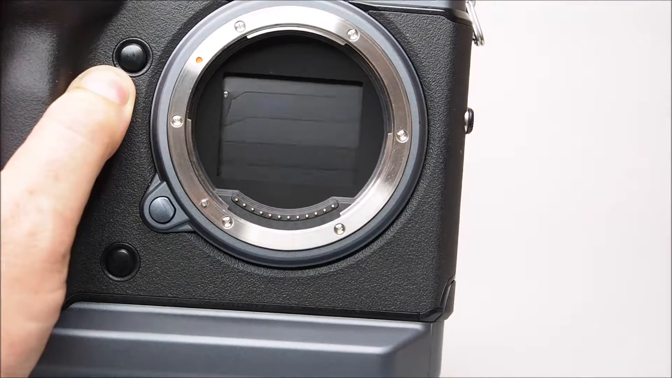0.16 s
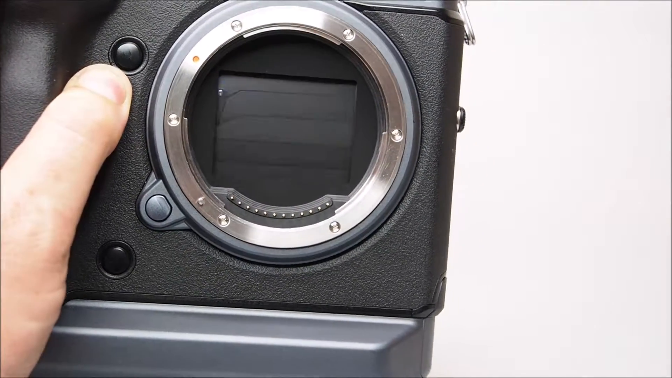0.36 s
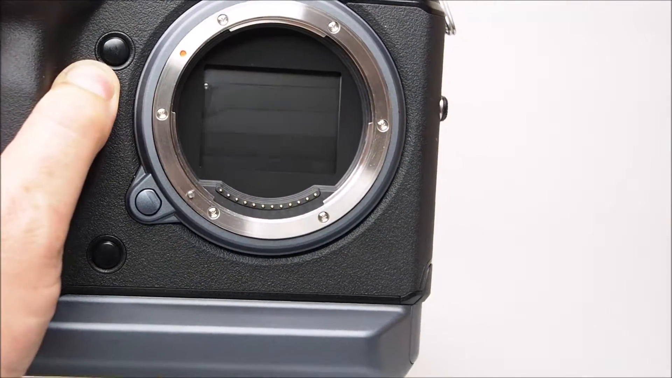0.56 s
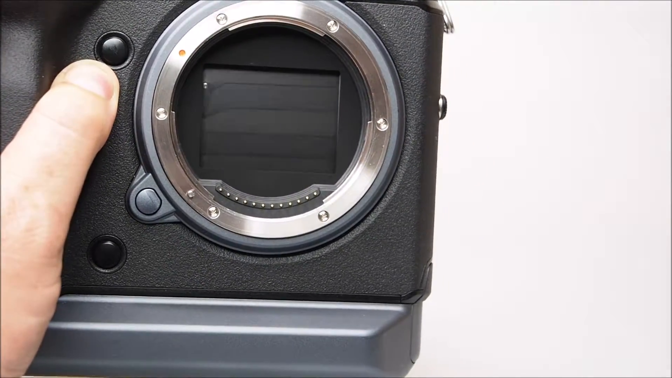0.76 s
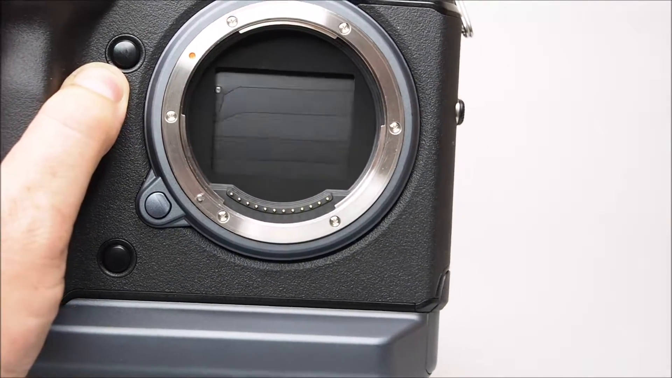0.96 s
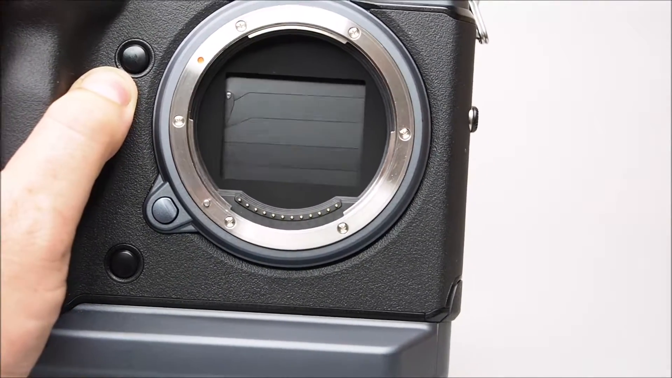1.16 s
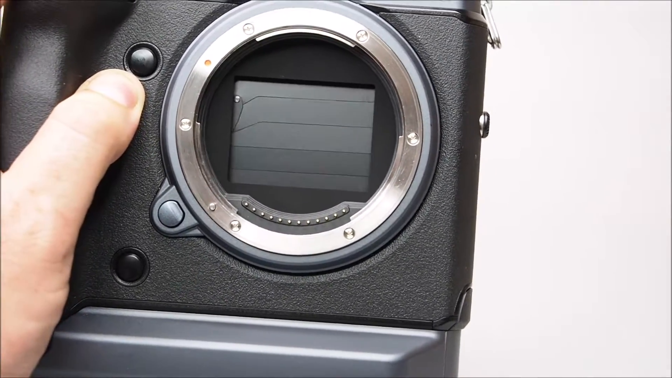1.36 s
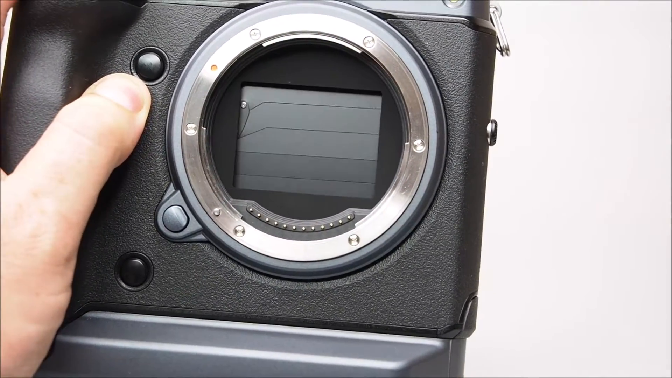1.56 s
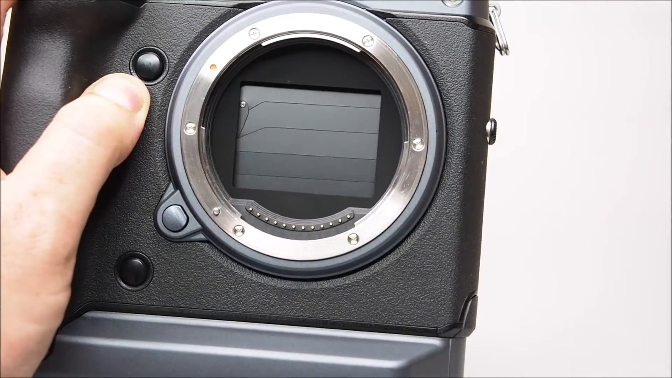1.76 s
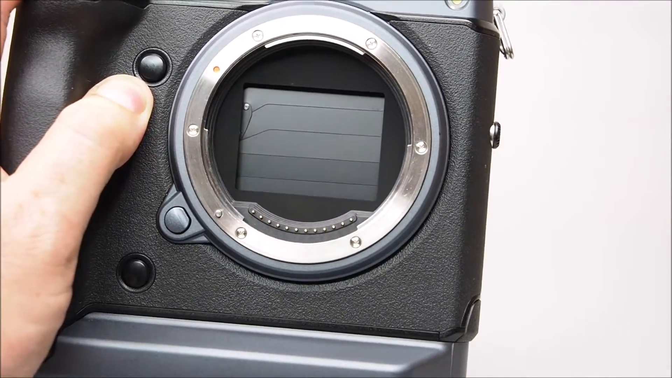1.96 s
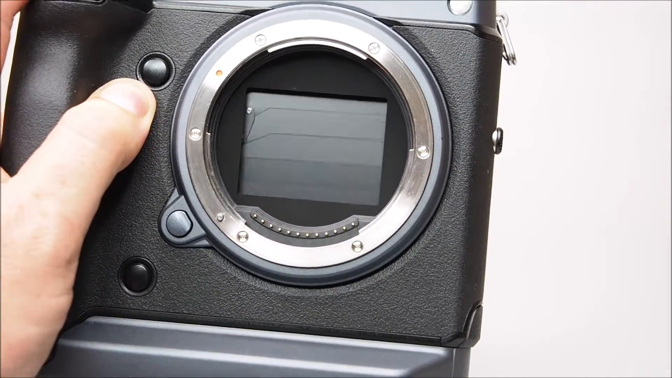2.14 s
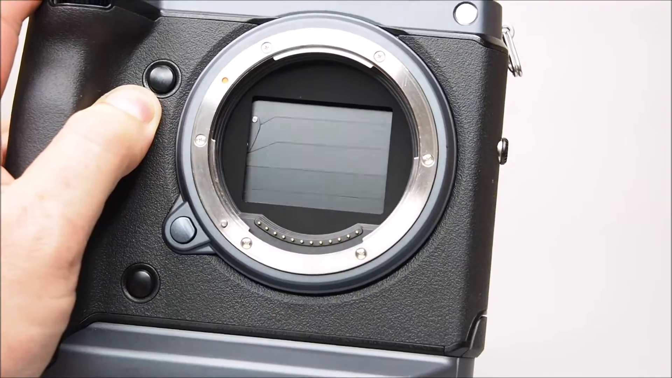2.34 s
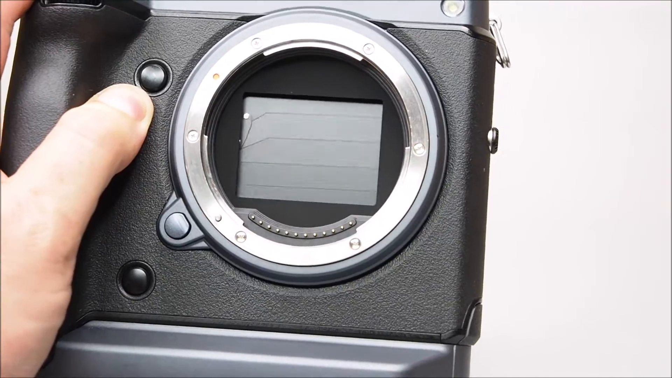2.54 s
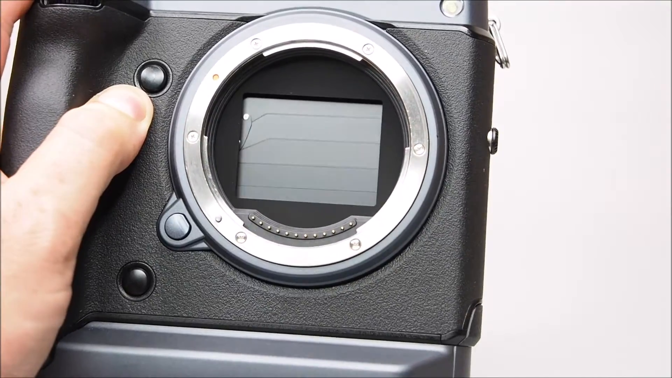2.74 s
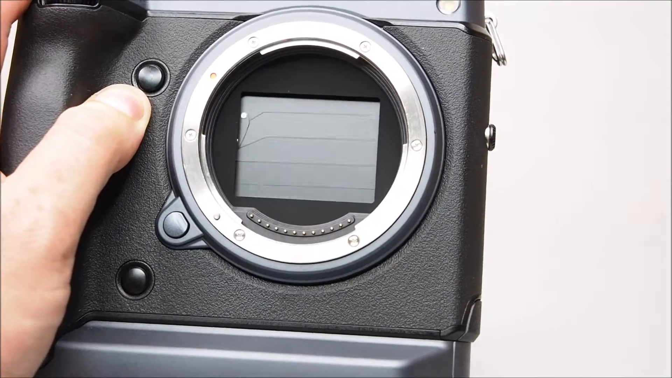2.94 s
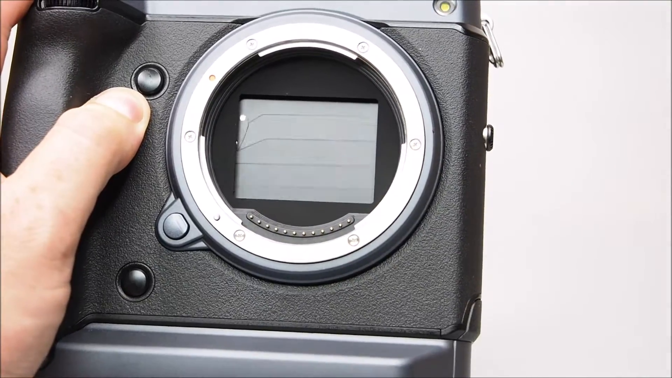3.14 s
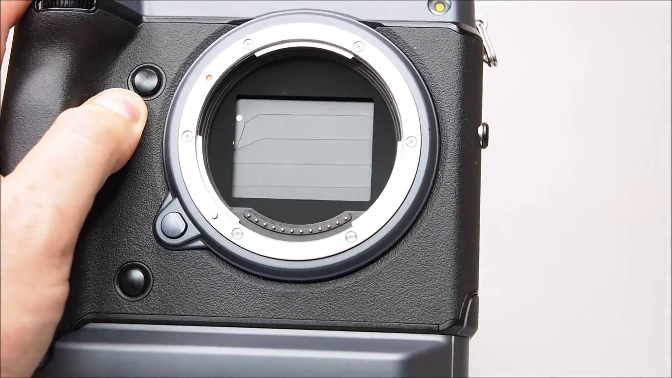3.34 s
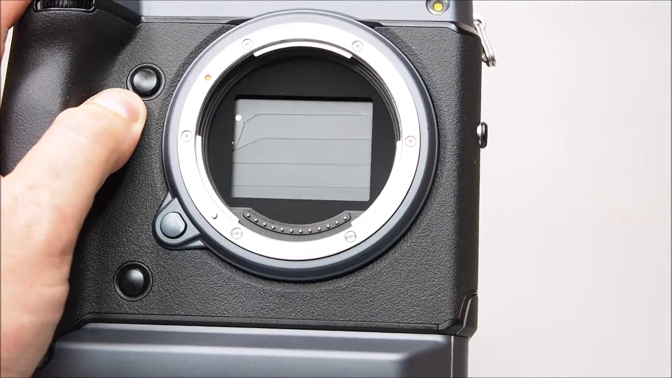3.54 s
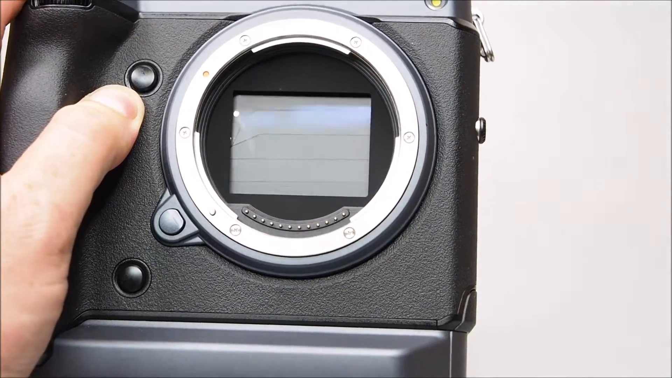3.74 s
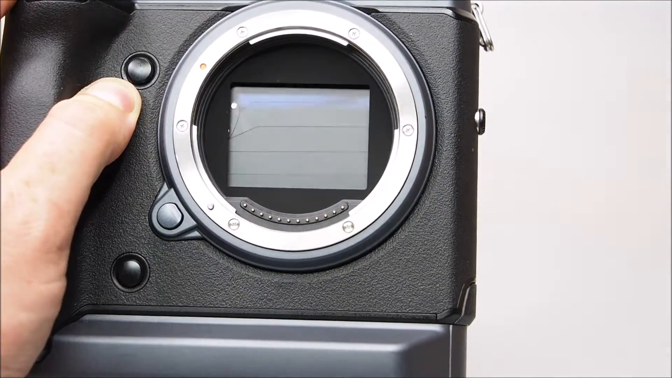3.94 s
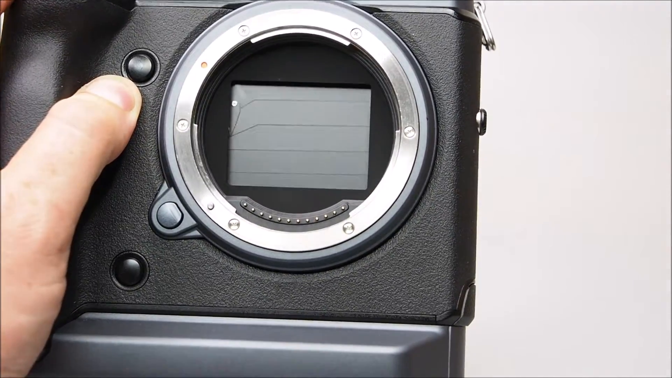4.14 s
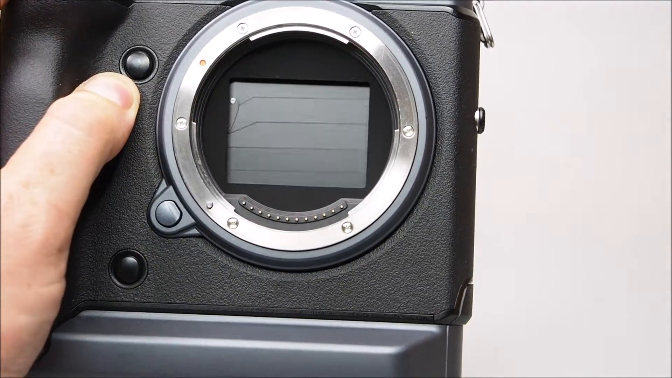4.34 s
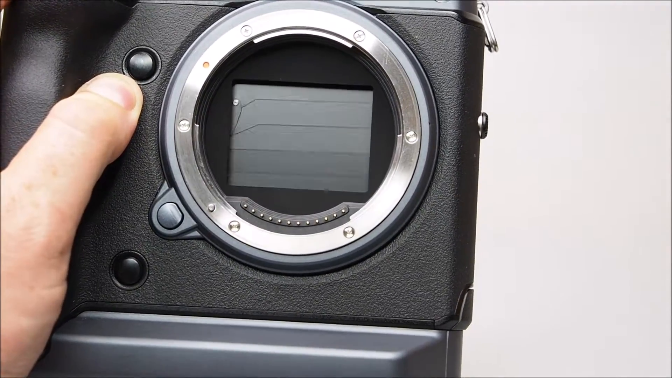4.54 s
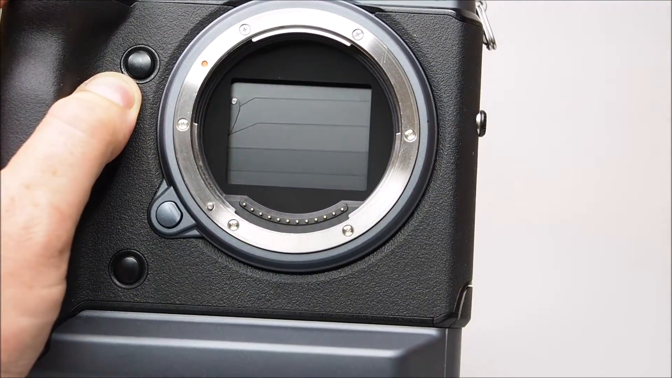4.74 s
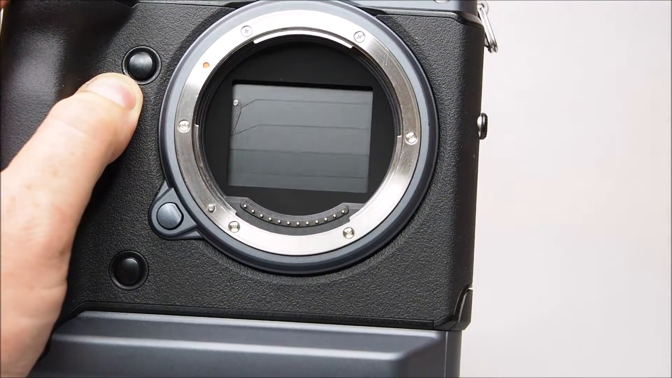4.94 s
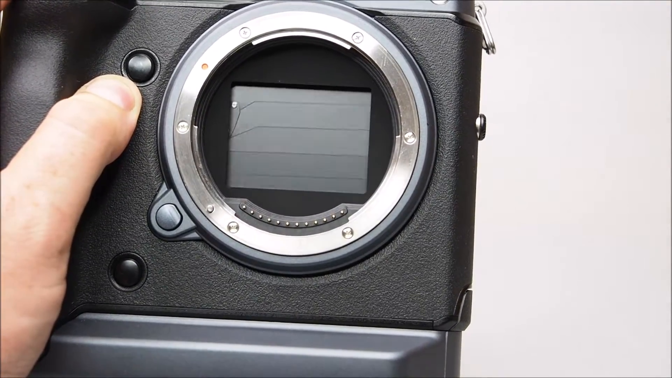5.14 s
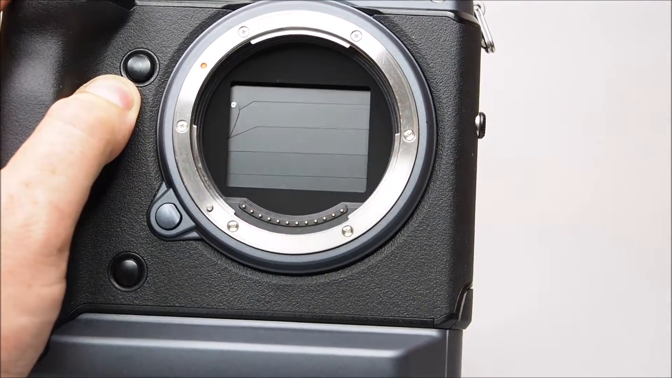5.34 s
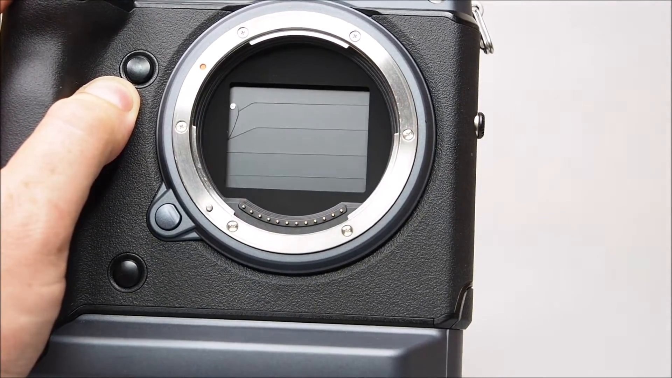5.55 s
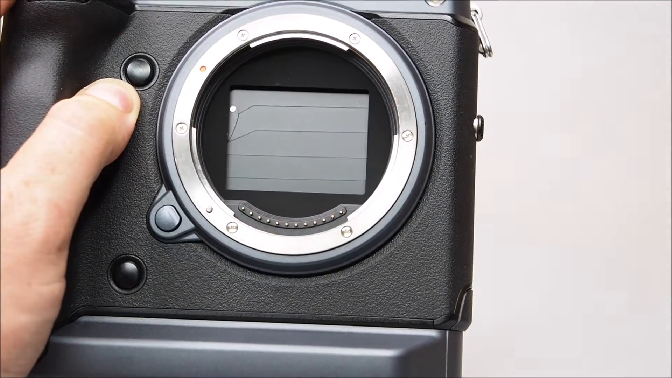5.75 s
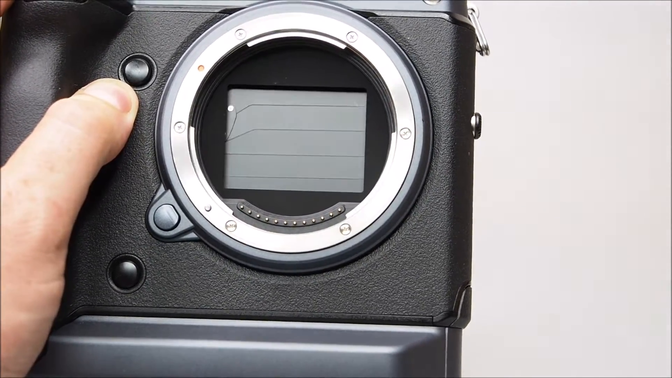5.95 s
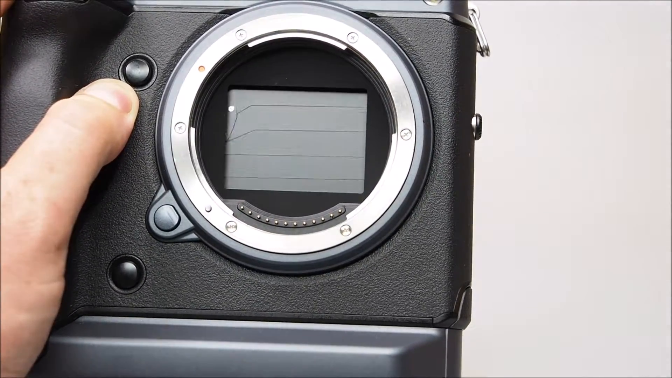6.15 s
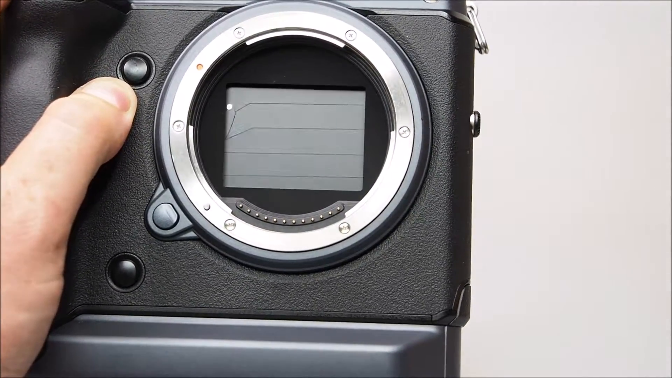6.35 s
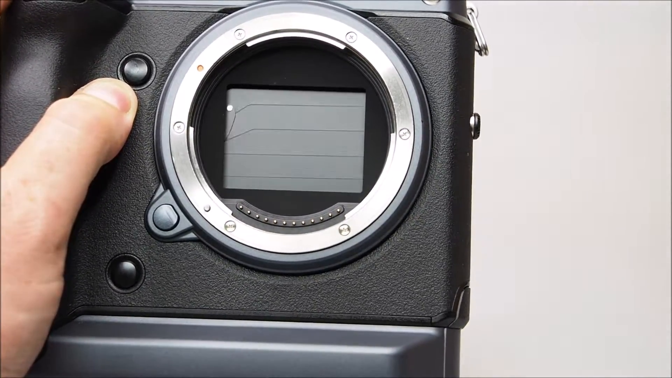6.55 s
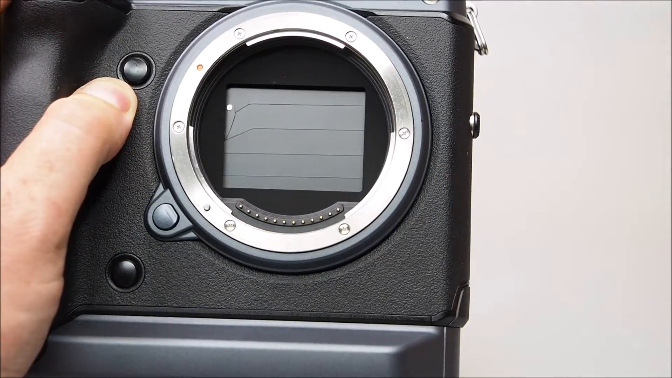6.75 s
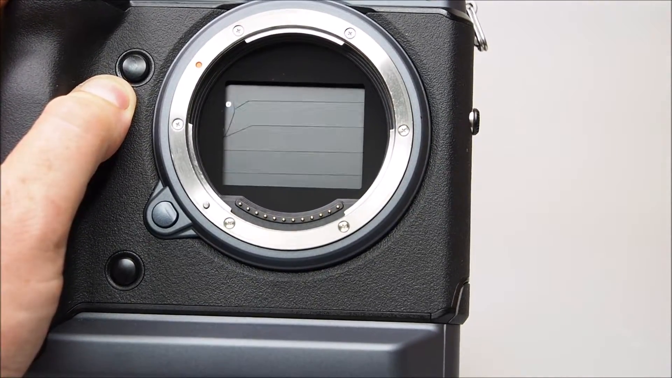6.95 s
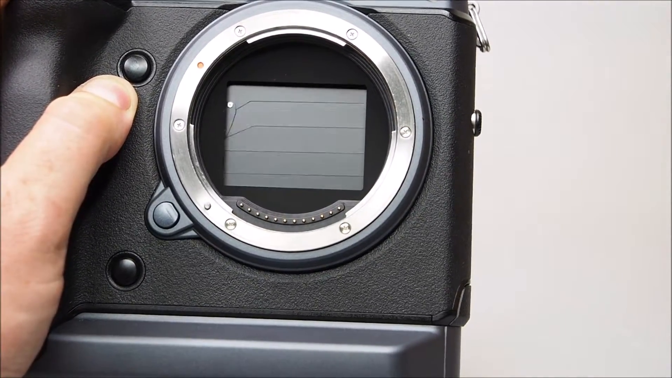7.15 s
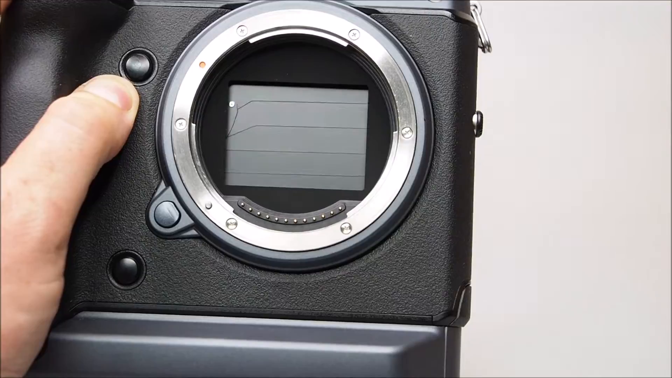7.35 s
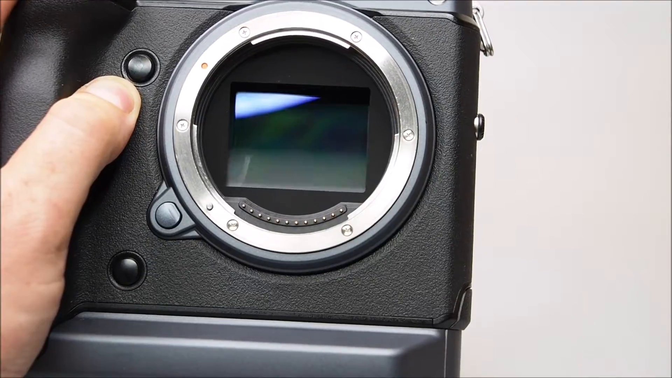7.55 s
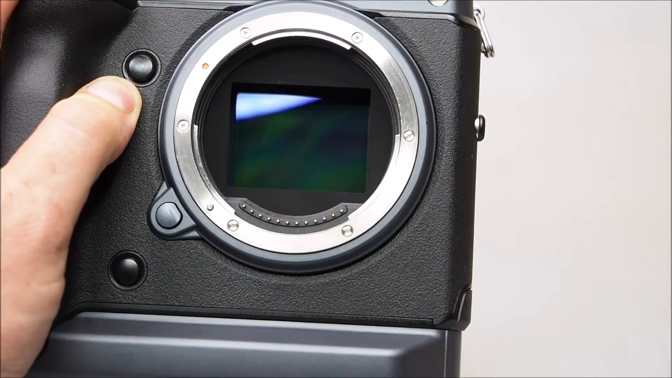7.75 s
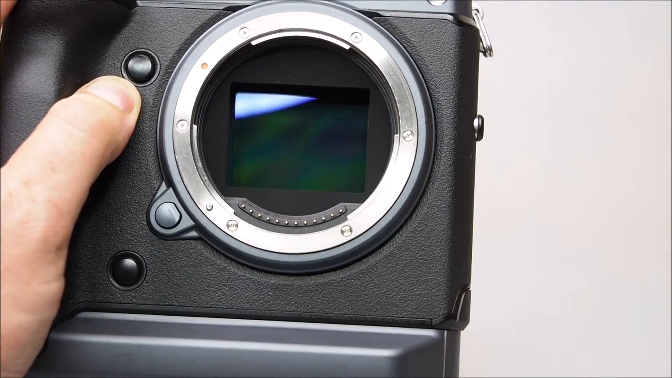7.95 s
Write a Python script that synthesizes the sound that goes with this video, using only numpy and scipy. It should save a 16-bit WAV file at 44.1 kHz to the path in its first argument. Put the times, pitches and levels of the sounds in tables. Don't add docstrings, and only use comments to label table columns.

```python
import sys
import numpy as np
from scipy import signal
from scipy.fft import rfft, irfft, next_fast_len
from scipy.io import wavfile
from scipy.ndimage import map_coordinates

SR = 44100
rng = np.random.default_rng(int(sys.argv[2]) if len(sys.argv) > 2 else 0)


def magnitude_from_level(level_db):
    exponent = np.asarray(level_db, float) / 20
    return 10 ** exponent


def int16_out(signal):
    q = np.round(np.clip(np.atleast_2d(signal).T, -1, 1) * 32767)
    wavfile.write(sys.argv[1], SR, q.astype(np.int16))


N = 352800
PAD = SR // 4

# f/Hz, level/dB per Hz
HUSH_COLOUR = [(15, -25), (25, -5), (64, -1), (145, -4), (240, -3), (300, -9), (600, -13), (1000, -17),
               (2000, -23), (5500, -24), (7000, -28), (12000, -33), (16000, -37)]
# t/s, half-length/s, level/dB
PASSING = [(.15, .1, 9), (1.2, .1, 7), (1.75, .15, 9), (3.3, .25, 6), (5.3, .1, 6), (5.95, .2, 8),
           (6.68, .3, 12), (7.3, .2, 5)]
HUSH_DB, DRONE_DB, DRONE_HZ = -55, -66, 64.6
RECOVER_S, RECOVER_FOR_S, RECOVER_DB = 7.42, .3, 9.5

FIRST_S, FRAME_S, FRAME_COUNT = -.0285, .2, 38
# frame number, lateness/ms
DRIFT = [(0, 0), (2, -.3), (3, -3), (6, -4), (7, -2.7), (8, -5.3), (12, -10.7), (14, -11.9), (15, -11.4),
         (16, -8.1), (18, -8), (19, -1.2), (23, -5.6), (24, -8.4), (26, -8.6), (28, -13.1), (35, -13.8),
         (37, -13.8)]

# t/ms from the cue, level/dB, hold/ms, time to fall 60 dB/ms,
# share that repeats from frame to frame (0-1)
RELEASE = [
    (-9.9, -15, 1.2, 9, .7),
    (-7.6, -17, 1.8, 9, .6),
    (-1.8, -23, 1.7, 3, .5),
]
SLAM = [
    (-.05, -8, .4, 5, .9),
    (.62, -12, .5, 5, .8),
    (1.7, -14, .3, 8, .7),
]
REBOUND = [
    (-.6, -3, 1.07, 19.7, .5),
    (4.498, -11.5, 3.4, 39, .5),
]
FIRST_LATCH = [(0, -21, 1.2, 9, .2)]
SECOND_LATCH = [
    (0, -19, 1.4, 9, .3),
    (6.8, -19, 1, 8, .3),
    (9.6, -20, 1.2, 18, .3),
]
# t/s, level/dB, hold/ms, time to fall 60 dB/ms
LAST_CATCH = [
    (7.517, -16.5, 2.1, 7.4),
    (7.5895, -21, .4, 7.4),
    (7.5945, -24, 0.33, 6),
]
SLAM_DB, REBOUND_DB = -6, -10.5
REBOUND_MS, REBOUND_SPREAD_MS, LATE_LOSS_DB_PER_MS = 5.9, .8, 2
FIRST_LATCH_MS, SECOND_LATCH_MS, LATCH_SPREAD_MS = 121.6, 136.8, .5

# f/Hz, level/dB per Hz
RELEASE_TONE = [(88, -69), (250, -16.5), (1630, -7), (2760, -4.5), (5050, 1), (7470, -1.5), (10400, -5),
                (11300, -1.5), (13200, -2), (16000, -10)]
SLAM_TONE = [(88, -55), (150, -39), (1690, -17.5), (2810, -3), (4580, -2.5), (5680, -6.5), (6640, 10),
             (7770, 0.5), (8900, -1.5), (14800, -4), (16000, -10.5)]
REBOUND_TONE = [(88, -47.5), (250, -24), (1600, -3), (2760, -2), (3840, 0.5), (5790, 0.5), (6770, -27),
                (7470, -3.5), (14800, -7.5), (16000, -40)]
LATCH_TONE = [(88, -57), (150, -30.5), (854, -12.5), (1630, -14.5), (2980, -5.5), (4580, -3.5), (5790, -4),
              (10400, -6.5), (12200, -5.5), (16000, -18.5)]
LAST_TONE = [(350, -62), (600, -34), (944, -45), (1730, -22), (3390, -15), (4340, -14), (6030, -2),
             (7210, -12), (12200, -9), (16000, -20)]
GEAR_TONE = [(120, -41), (200, -27), (1400, -15.5), (2210, -14.5), (2800, -9.5), (3310, -11), (5520, -11.5),
             (6400, -12), (16000, -12.5)]
# f/Hz, width/Hz, level/dB
CHASSIS = [(432, 250, 6), (804, 58, 7), (1093, 120, 1.5), (2733, 270, 3), (3420, 200, 2), (5540, 520, 6.5),
           (7230, 1300, -2.5), (8180, 340, 5), (10800, 1200, -2.5)]
# f/Hz, level/dB, time to fall 60 dB/ms
KNOCK = [(425, -38, 70), (805, -39, 45)]

# t/ms after the slam, gear rattle/dB, tooth load/dB, tooth-meeting f/Hz
WIND = [
    (73.3, -72, -80, 4200),
    (85.3, -33, -42, 4950),
    (93, -32.5, -34, 5250),
    (102, -30, -27.5, 5720),
    (117.1, -28, -32, 5480),
    (132.1, -29, -40.5, 5700),
    (147.7, -27.5, -23.5, 6000),
    (152.2, -52, -38, 6000),
    (165, -88, -84, 6800),
]
# t/s, gear rattle/dB, tooth load/dB, tooth-meeting f/Hz
LAST_WIND = [(7.515, -90, -85, 5910), (7.522, -48, -60, 5900), (7.538, -37, -46, 5845),
             (7.55, -29, -24, 5800), (7.561, -23.5, -36, 5650), (7.573, -26, -22, 5600),
             (7.597, -23, -34, 5560), (7.614, -40, -44, 5560), (7.67, -85, -76, 5500)]
# f/Hz, width/Hz, level/dB
PLATE = [(2890, 380, -5), (1290, 80, -11), (4770, 310, -2), (7400, 140, -11), (8200, 160, -33),
         (11600, 93, -24)]
PLATE_NOISE_DB, ODD_TOOTH_DB, MESH_DB = 0, 4, -2

# f/Hz, likeness (-1 to 1)
ALIKE = [(60, .8), (300, .94), (1000, .93), (2500, 0.6), (5000, 0.43), (9000, .45), (15000, 0.3)]
# f/Hz, left minus right level/dB
LEAN = [(60, 1), (180, -0.5), (550, 1.5), (1650, -1), (4970, 0), (15000, 2)]
# f/Hz, time to fall 60 dB/s
WALLS = [(300, .4), (1500, .3), (5000, .22), (15000, .22)]
# f/Hz, width/Hz, level/dB
NOTCHES = [(580, 90, -10), (1640, 120, -6), (6500, 320, -14), (10400, 800, -24)]


def unit(x):
    return x / np.sqrt(np.mean(x ** 2) + 1e-20)


def along(points, hz):
    f, v = np.transpose(points)
    return np.interp(np.log(hz + 1), np.log(f + 1), v)


def filtered(x, response):
    m = next_fast_len(x.shape[-1] + 8192)
    spectrum = rfft(x, m) * response(np.fft.rfftfreq(m, 1 / SR))
    return irfft(spectrum, m)[..., :x.shape[-1]]


def resonances(modes, hz):
    total = 0
    for k, (centre, width, db) in enumerate(modes):
        ring = 1j * hz * width / (centre * centre - hz * hz + 1j * hz * width)
        total = total + (-1) ** k * magnitude_from_level(db) * ring
    return total


def struck(x, tone):
    hz = np.fft.rfftfreq(4096, 1 / SR)
    ringing = sum(np.abs(resonances([mode], hz)) ** 2 for mode in CHASSIS)
    gain = magnitude_from_level(along(tone, hz)) * np.sqrt(1 + ringing)
    cepstrum = irfft(np.log(unit(gain) + 1e-6))
    cepstrum[1:2048] *= 2
    cepstrum[2049:] = 0
    response = irfft(np.exp(rfft(cepstrum)))
    return signal.fftconvolve(x, response[None], axes=1)[:, :x.shape[1]]


def wobble(rate):
    knots = rng.standard_normal(int((N + PAD) * rate / SR) + 4)
    return map_coordinates(knots, [np.arange(N + PAD) * rate / SR])


def add(track, s, db, hold_ms, t60_ms, noise):
    ms = np.arange(noise.shape[1]) * 1000 / SR
    fade = magnitude_from_level(db - 60 * np.maximum(ms - hold_ms, 0) / t60_ms)
    shape = fade * (1 - np.exp(-ms / 0.046))
    track[:, PAD + round(s * SR):][:, :len(ms)] += shape * noise


def contacts(cue_s, cue_db, parts, scatter_db, snap_db=-40):
    track = np.zeros((2, N + PAD + SR))
    for ms, db, hold_ms, t60_ms, same in parts:
        habit = rng.standard_normal((2, 1536))
        habit[0, 5] = magnitude_from_level(snap_db)
        same = np.clip(same, 0, 1)
        for s, level in zip(cue_s, cue_db):
            fresh = rng.standard_normal((2, 1536))
            noise = np.sqrt(same) * habit + np.sqrt(1 - same) * fresh
            add(track, s + ms / 1000, db + level + rng.normal(0, scatter_db), hold_ms, t60_ms, noise)
    return track[:, :N + PAD]


def stereo(pair, alike, lead):
    def spread(hz):
        angle = np.arccos(np.clip(along(alike, hz), -1, 1)) / 2
        return np.array([np.cos(angle), np.sin(angle)])

    def lean(hz):
        tilt = magnitude_from_level(along(LEAN, hz) / 2) * np.exp(1j * np.pi * hz * lead / SR)
        return np.array([tilt, 1 / tilt])

    mid, side = filtered(pair, spread)
    return filtered(np.array([mid + side, mid - side]), lean)


def hush():
    t = (np.arange(N + PAD) - PAD) / SR
    noise = unit(filtered(rng.standard_normal((2, N + PAD)), lambda hz: magnitude_from_level(along(HUSH_COLOUR, hz))))
    drone_level = magnitude_from_level(2.5 * wobble(9))
    drone_turn = 2 * np.pi * np.cumsum(DRONE_HZ * (1 + .03 * wobble(5))) / SR
    drone = drone_level * np.sin(drone_turn) * [[1.4], [.3]]
    traffic_db = DRONE_DB + sum(db * np.exp(-((t - s) / half) ** 2) for s, half, db in PASSING)
    air = magnitude_from_level(HUSH_DB + 1.5 * wobble(7.9)) * noise + magnitude_from_level(traffic_db) * drone
    gain = magnitude_from_level(RECOVER_DB * np.clip((t - RECOVER_S) / RECOVER_FOR_S, 0, 1))
    return stereo(gain * air, [(60, .84), (200, .74), (3000, .5), (12000, .2)], lead=0)


def slam_times():
    frame = np.arange(FRAME_COUNT)
    return FIRST_S + FRAME_S * frame + np.interp(frame, *np.transpose(DRIFT)) / 1000


def curtains():
    s = slam_times()
    late_ms = REBOUND_SPREAD_MS * rng.uniform(-1, 1, len(s))
    release = contacts(s, 0 * s, RELEASE, scatter_db=1.1, snap_db=8)
    slam = contacts(s, 0 * s + SLAM_DB, SLAM, scatter_db=0.0, snap_db=24.0)
    rebound_s = s + (REBOUND_MS + late_ms) / 1000
    rebound_db = REBOUND_DB - LATE_LOSS_DB_PER_MS * late_ms
    rebound = contacts(rebound_s, rebound_db, REBOUND, scatter_db=2.0)
    release = magnitude_from_level(-1.5) * struck(release, RELEASE_TONE)
    slam = magnitude_from_level(4.0) * struck(slam, SLAM_TONE)
    return release + slam + magnitude_from_level(1.3) * struck(rebound, REBOUND_TONE)


def knock():
    track = np.zeros((2, N + PAD + SR))
    t = np.arange(4096) / SR
    for s in slam_times():
        for hz, db, t60_ms in KNOCK:
            tone = np.outer([1, 1], np.sin(2 * np.pi * hz * t))
            add(track, s, db + rng.normal(0, 1.5), 4, t60_ms, tone)
    return track[:, :N + PAD]


def room(x, same):
    step = SR // 5
    blocks = np.pad(x, (130, -(len(x) + 130) % step)).reshape(-1, 1, step)
    noise = rng.standard_normal((len(blocks) + 1, 2, 2 * step))
    mixed = np.sqrt(same) * noise[0] + np.sqrt(1 - same) * noise[1:]
    hz, t, z = signal.stft(mixed, SR, nperseg=256)
    fade = magnitude_from_level(-60 * t / along(WALLS, hz)[:, None])
    tails = signal.istft(z * fade, SR, nperseg=256)[1][..., :2 * step]
    answers = signal.fftconvolve(blocks, tails / np.linalg.norm(tails[0, 0]), axes=2)
    out = np.zeros((2, (len(blocks) + 3) * step))
    for k, answer in enumerate(answers):
        out[:, k * step:][:, :answer.shape[1]] += answer
    return out[:, :len(x)]


def motor():
    stroke = np.array(WIND)
    rows = [np.c_[s + stroke[:, 0] / 1000, stroke[:, 1:]] for s in slam_times()[:-1]]
    s, *columns = np.vstack(rows + [LAST_WIND]).T
    t = (np.arange(N + PAD) - PAD) / SR
    rattle_db, load_db, mesh_hz = [np.interp(t, s, column) for column in columns]
    teeth = magnitude_from_level(1.26 * wobble(350)) * rng.standard_normal((2, N + PAD))
    rattle = magnitude_from_level(rattle_db) * unit(struck(teeth, GEAR_TONE))
    turn = 2 * np.pi * np.cumsum(mesh_hz * (1 + .014 * wobble(200))) / SR
    odd = magnitude_from_level(load_db + ODD_TOOTH_DB + 3 * wobble(190)) * np.sin(turn / 2) * [[1], [.4]]
    shaking = magnitude_from_level(rattle_db + PLATE_NOISE_DB) * teeth + odd
    whine = filtered(shaking, lambda hz: resonances(PLATE, hz))
    mesh_level = magnitude_from_level(load_db + MESH_DB + 2.6 * wobble(200))
    mesh = mesh_level * np.array([np.sin(turn), 0.25 * np.cos(turn)])
    return rattle + whine + mesh


def latches():
    s = slam_times()[:-1]
    s = s + LATCH_SPREAD_MS * rng.standard_normal(len(s)) / 1000
    first = contacts(s + FIRST_LATCH_MS / 1000, 0 * s, FIRST_LATCH, scatter_db=0.5)
    second = contacts(s + SECOND_LATCH_MS / 1000, 0 * s, SECOND_LATCH, scatter_db=0.5, snap_db=14.5)
    ticks = magnitude_from_level(-2.0) * first + magnitude_from_level(1.3) * second
    catch = np.zeros_like(ticks)
    for row in LAST_CATCH:
        add(catch, *row, rng.standard_normal((2, 2048)))
    return struck(ticks, LATCH_TONE) + struck(catch, LAST_TONE)


def scene():
    blows = curtains() + knock() + latches()
    gears = motor()
    echo = room(blows[0] + magnitude_from_level(-2) * gears[0], same=.35)
    camera = stereo(blows + gears + magnitude_from_level(-7.5) * echo, ALIKE, lead=0.83)
    return (camera + hush())[:, PAD:]


def low_pass(x):
    return signal.sosfilt(signal.butter(12, 16540, fs=SR, output="sos"), x)


def record(dry):
    def ports(hz):
        dips = [1 - (1 - magnitude_from_level(db)) * resonances([(f, width, 0)], hz) for f, width, db in NOTCHES]
        return np.prod(dips, axis=0)

    x = filtered(dry, ports)
    over = x - x / (1 + np.abs(x / .92) ** 8) ** (1 / 8)
    x = x - filtered(over, lambda hz: 1 / (1 + (500 / (hz + 1)) ** 4))
    x = filtered(x, lambda hz: magnitude_from_level(-np.clip((hz - 15650) / 18, 0, 21)))
    return low_pass(x)


dry = scene()
out = record(dry)
int16_out(out)
```